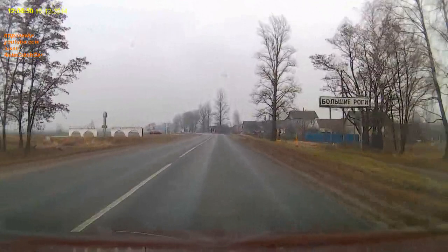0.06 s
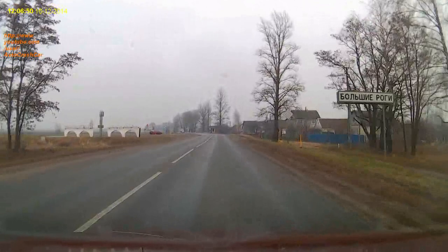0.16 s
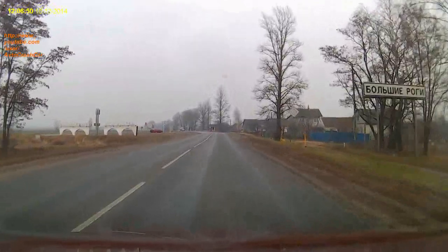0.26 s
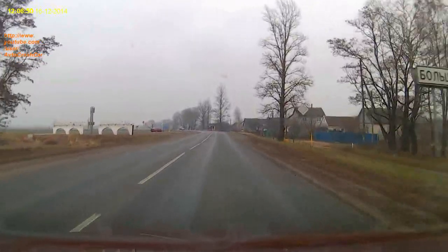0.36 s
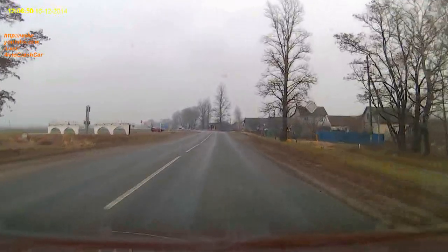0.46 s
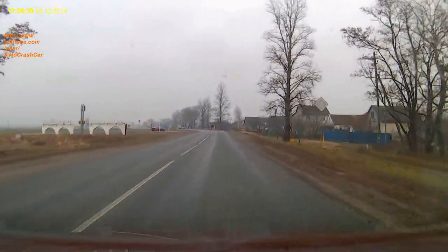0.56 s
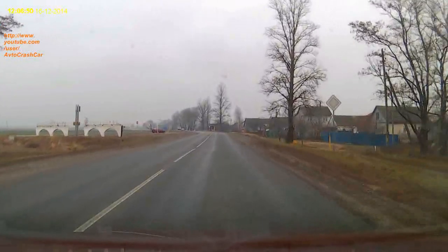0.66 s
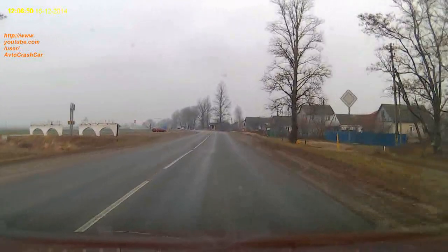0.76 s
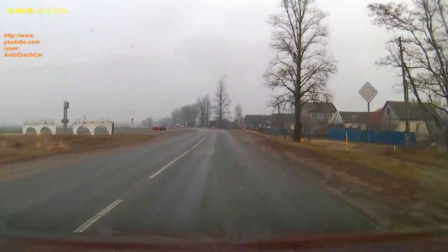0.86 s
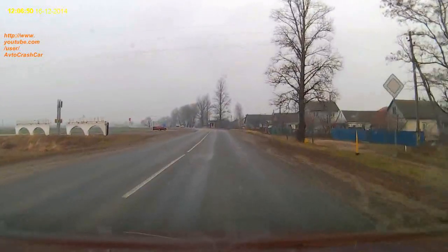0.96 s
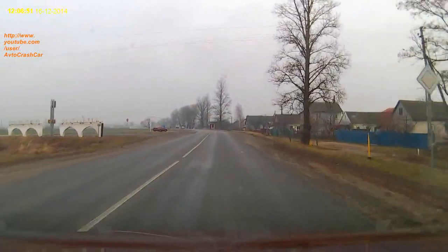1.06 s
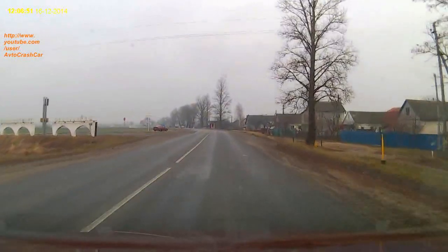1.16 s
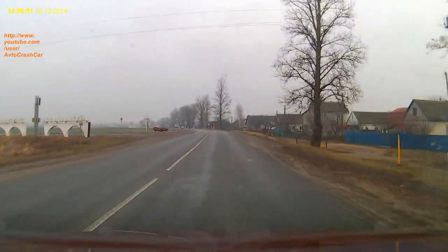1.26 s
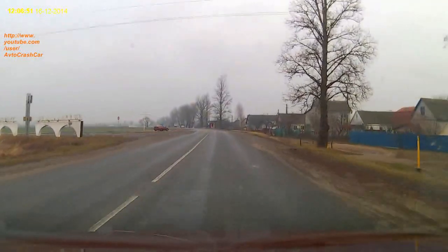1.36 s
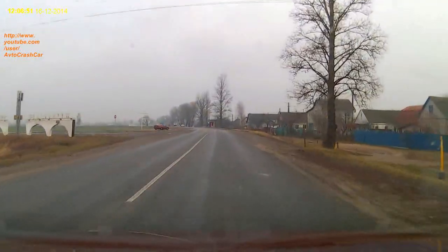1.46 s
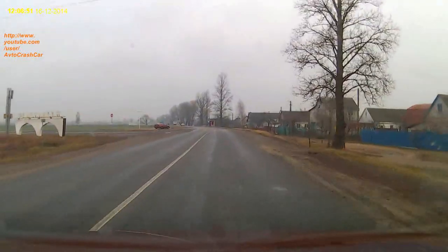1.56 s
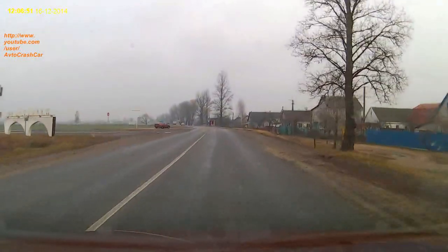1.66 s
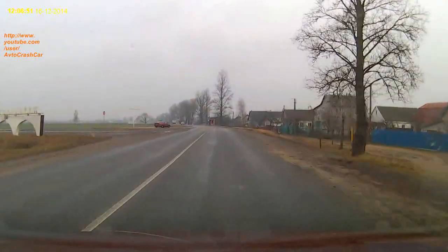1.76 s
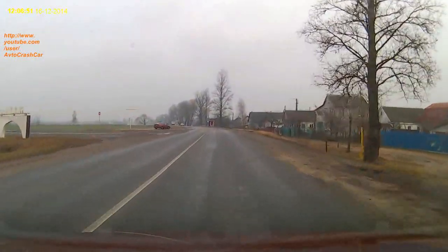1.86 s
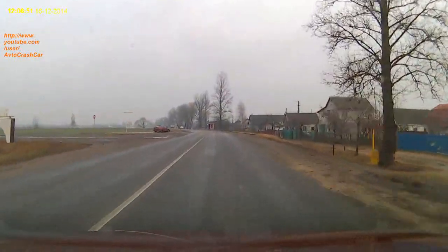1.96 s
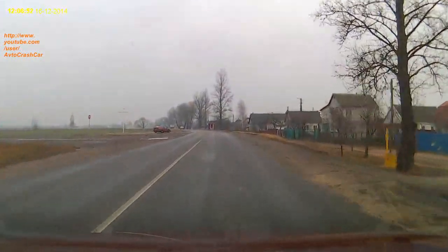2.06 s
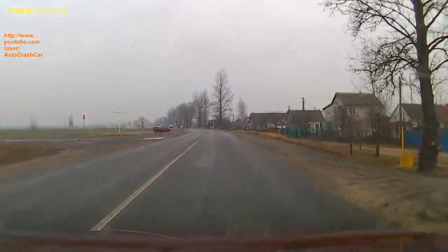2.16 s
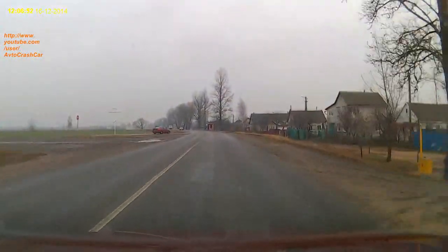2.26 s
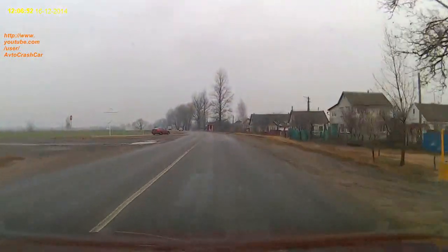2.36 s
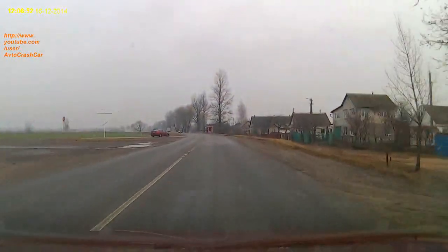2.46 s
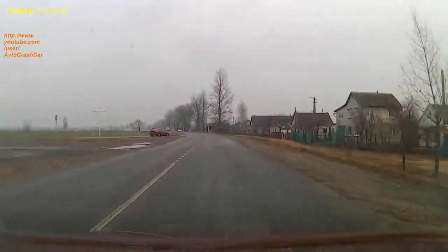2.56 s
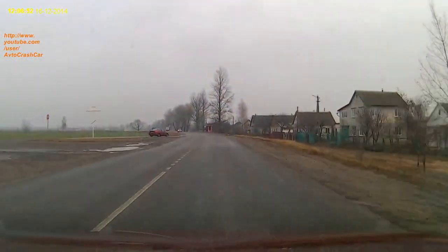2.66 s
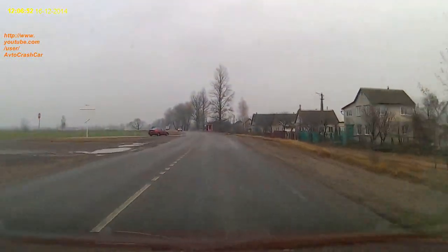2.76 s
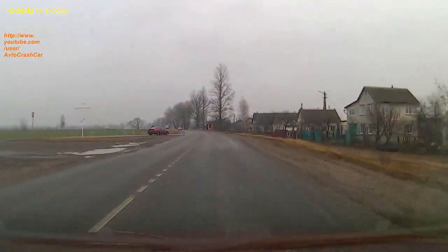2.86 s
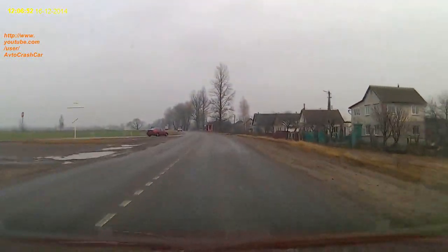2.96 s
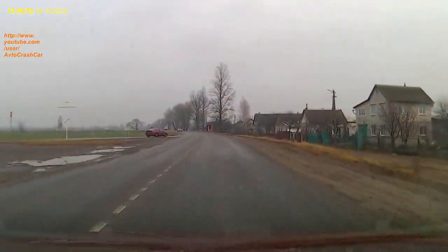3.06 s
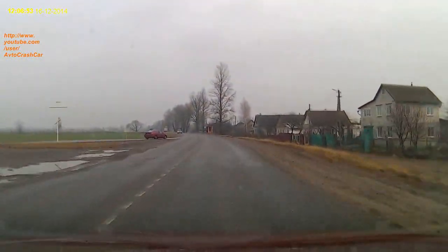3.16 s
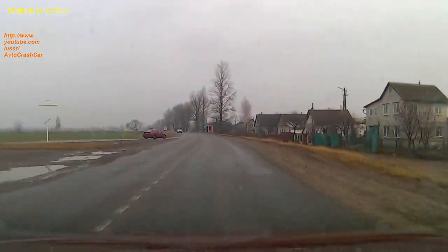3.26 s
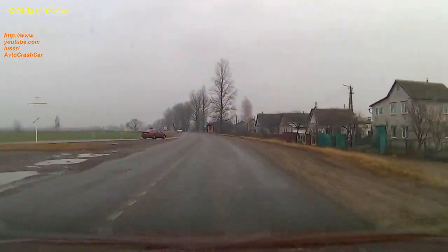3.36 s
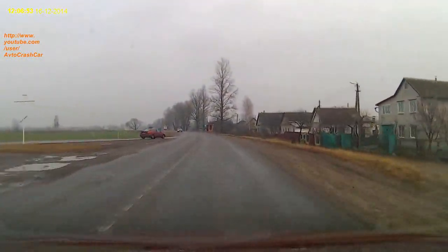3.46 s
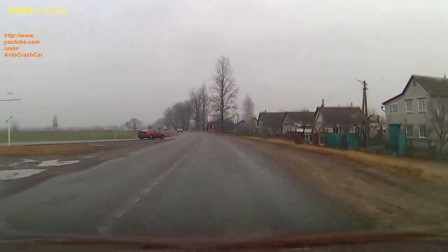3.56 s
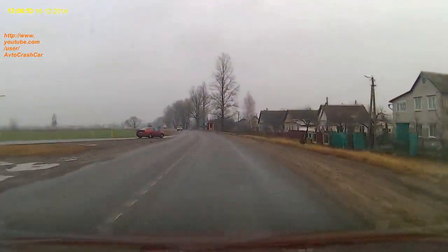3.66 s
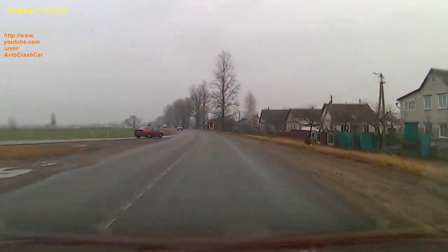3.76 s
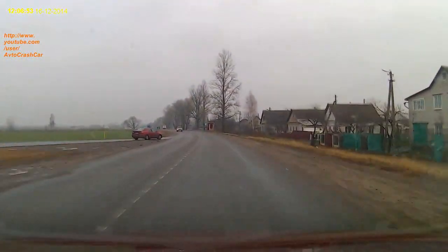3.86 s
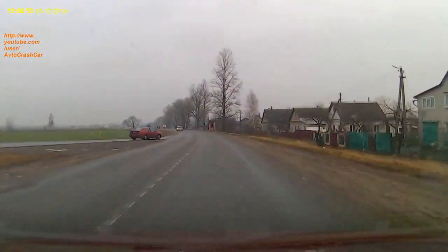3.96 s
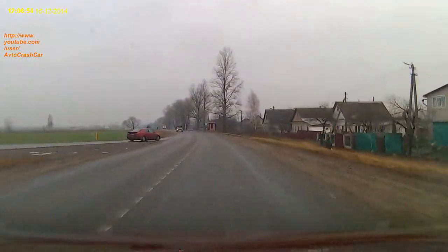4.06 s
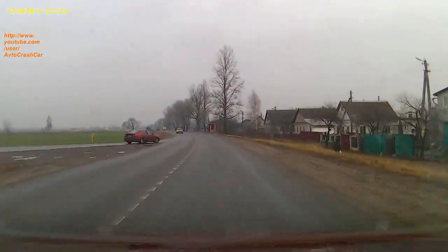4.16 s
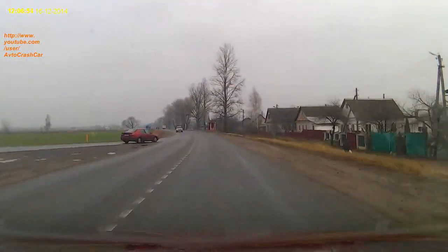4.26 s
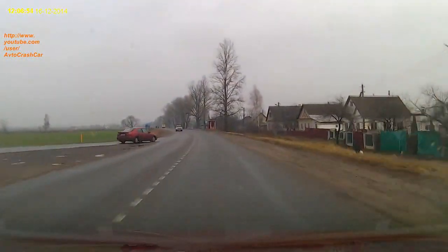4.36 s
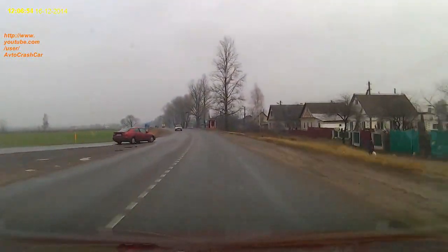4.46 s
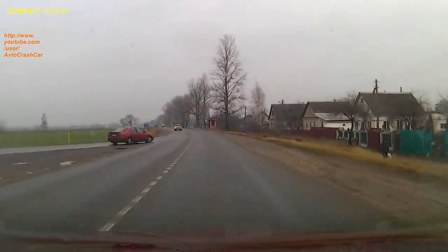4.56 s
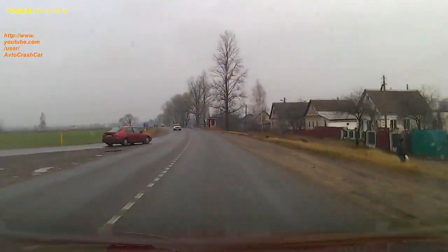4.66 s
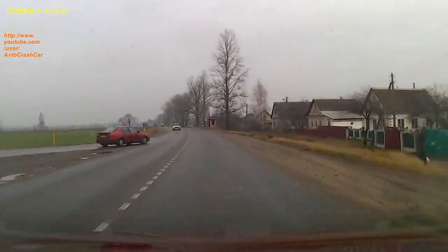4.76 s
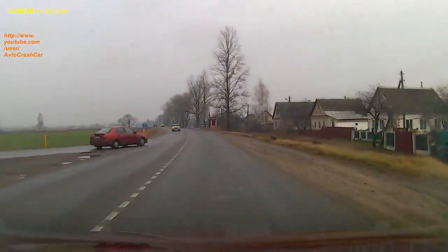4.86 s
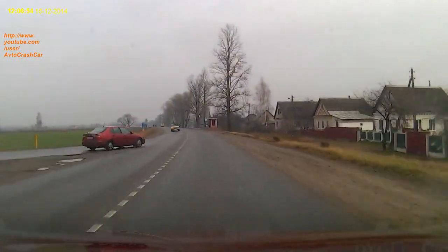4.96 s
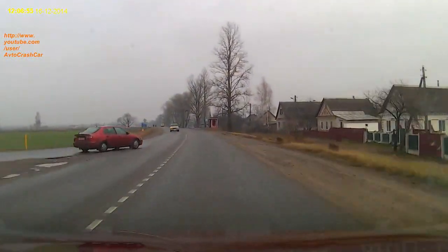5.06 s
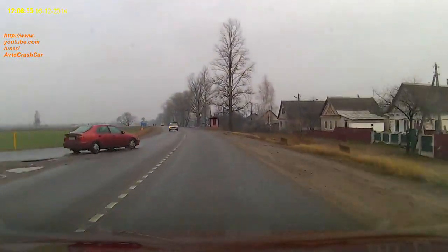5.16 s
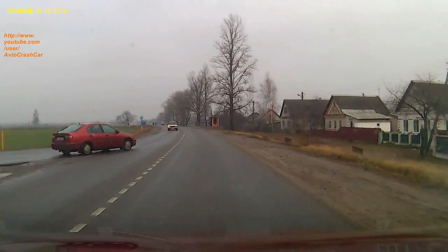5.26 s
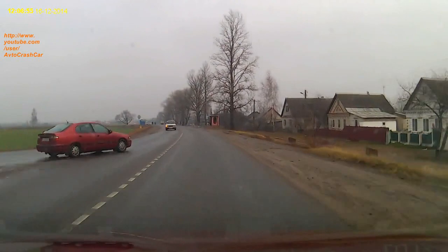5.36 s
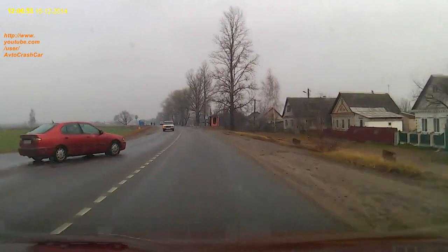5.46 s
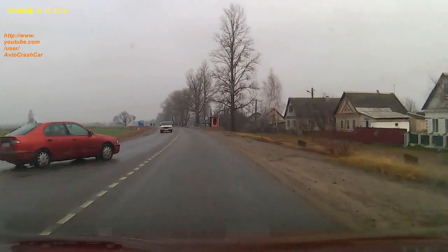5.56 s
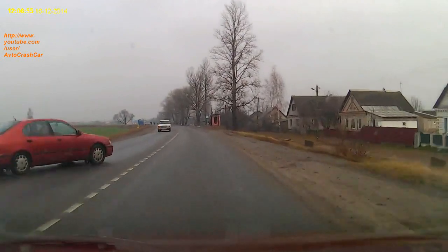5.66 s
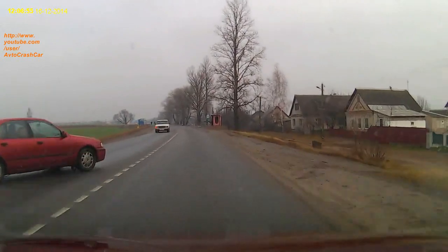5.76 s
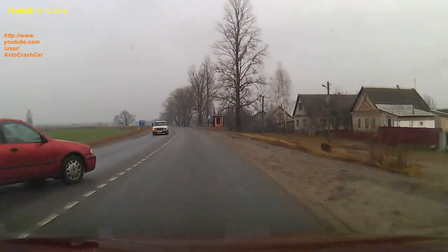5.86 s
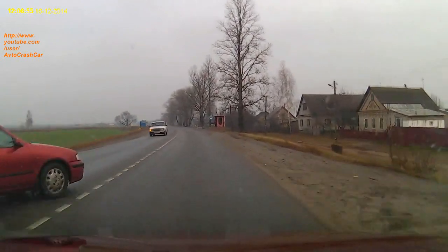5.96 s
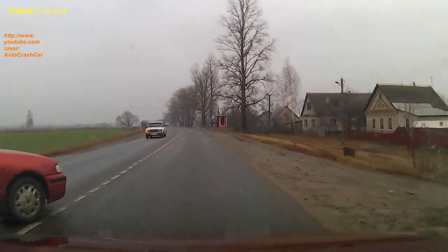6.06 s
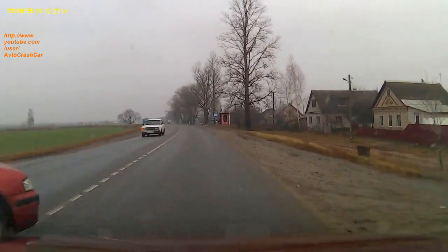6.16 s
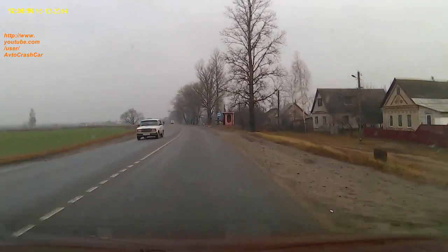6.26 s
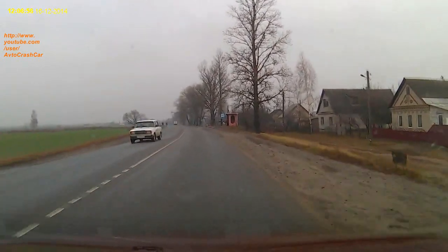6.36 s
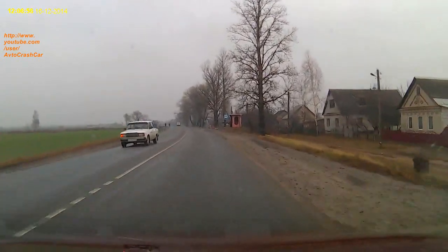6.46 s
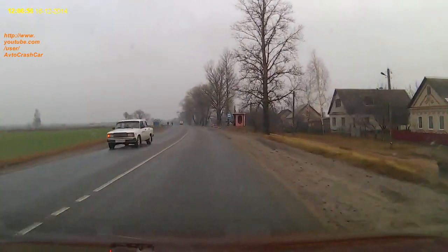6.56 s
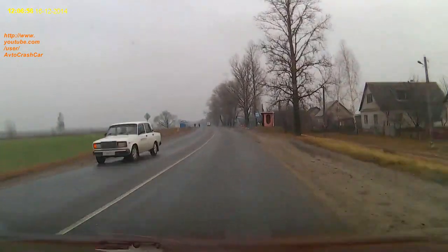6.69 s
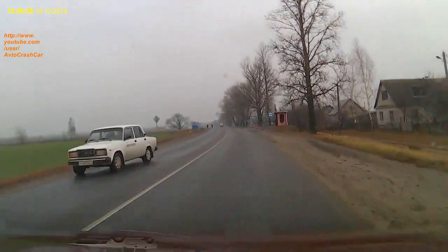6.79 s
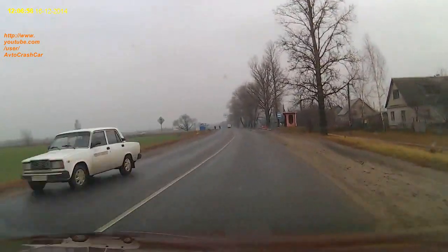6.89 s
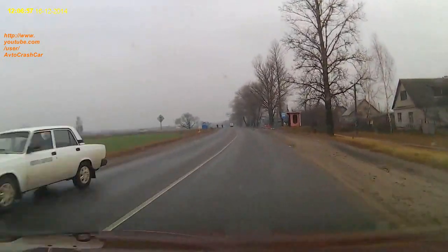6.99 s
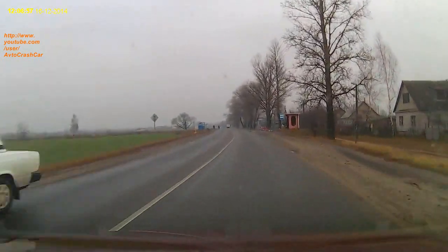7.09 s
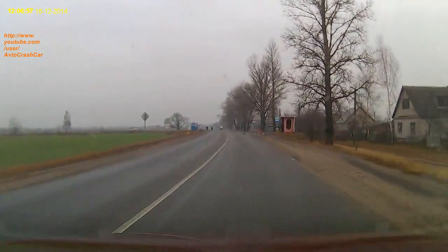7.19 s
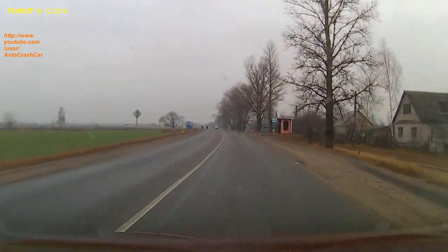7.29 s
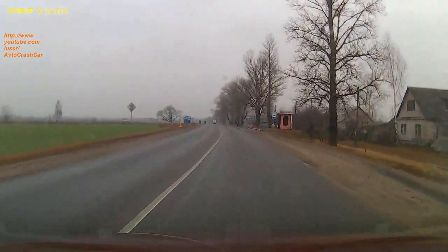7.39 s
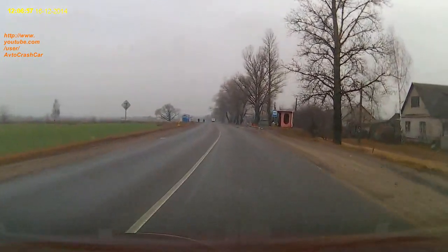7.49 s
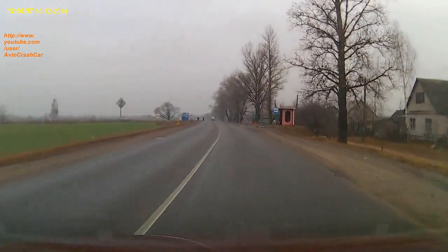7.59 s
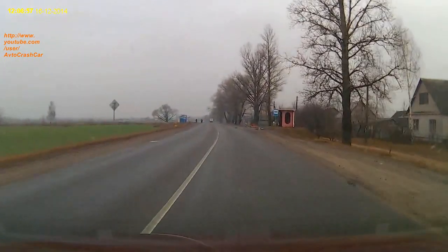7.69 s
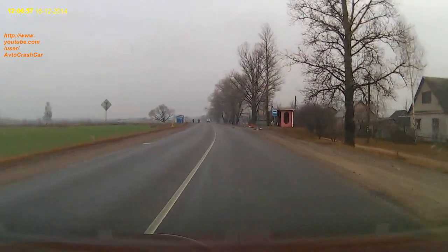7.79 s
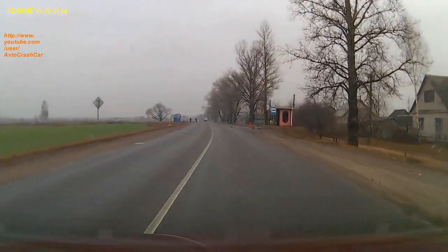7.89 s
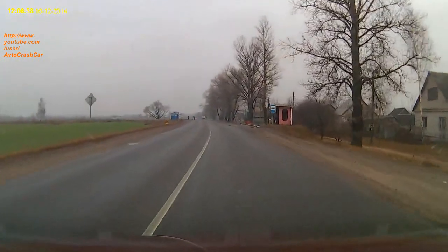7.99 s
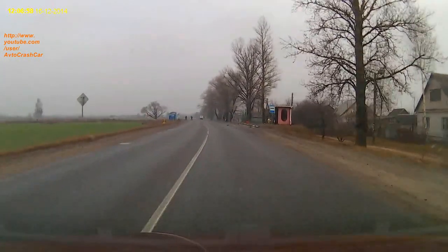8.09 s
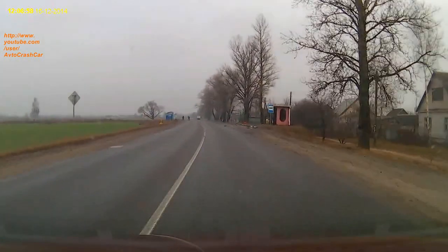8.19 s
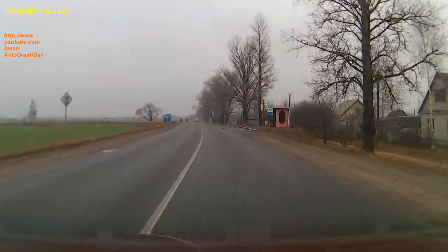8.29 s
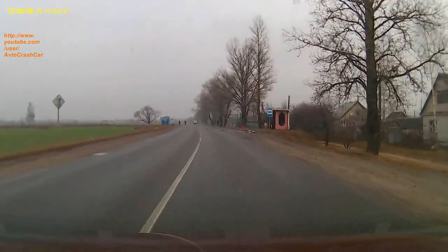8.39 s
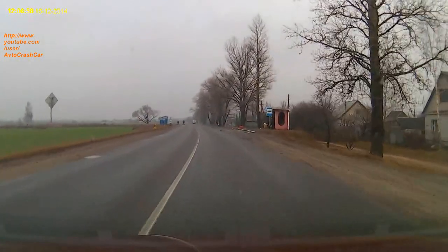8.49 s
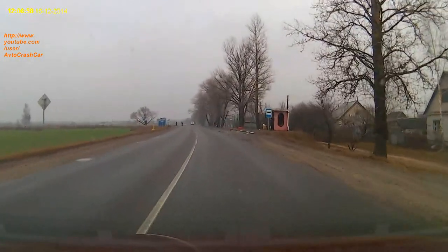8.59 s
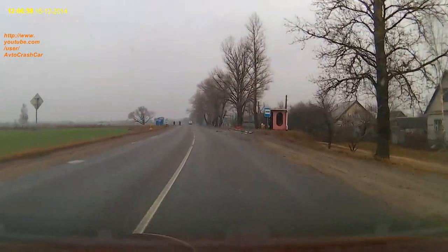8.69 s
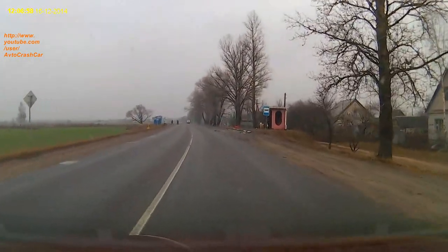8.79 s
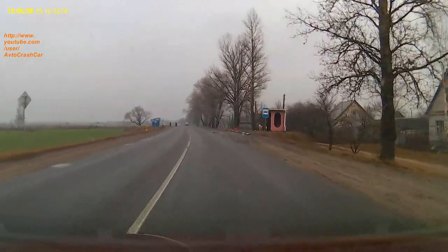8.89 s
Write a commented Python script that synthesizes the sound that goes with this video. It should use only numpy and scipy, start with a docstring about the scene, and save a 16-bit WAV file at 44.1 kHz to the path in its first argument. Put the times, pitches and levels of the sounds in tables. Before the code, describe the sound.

Inside a car on a wet road, the tyres roar and rumble steadily, while loose trim faintly buzzes, ticks and squeaks once. At about 5.7 seconds a two-tone horn sounds for under a second, over sliding tyres and a rough brake squeal that sinks slightly in pitch. At 6.4 seconds both stop as another car hits the side: metal crumples in loud jerks, parts crack and the body booms, overloading the small microphone, with a faint, very high fizz. Debris knocks dully against the panels until about 7.7 seconds, and the tyres skid again briefly near 7.1. From about 7.2 seconds the car rolls on with a damaged wheel thumping rapidly and unevenly. The thumps grow stronger around 8 seconds, shaking the dashboard into rattles and sharp plastic clacks over the road rumble until the end, near 9 seconds.

```python
"""Inside a car on a wet country road. The tyres roar and rumble with the road surface, and loose trim
buzzes, ticks and squeaks. A two-tone horn sounds over sliding tyres and squealing brakes. Another car
hits the side: metal crumples and parts crack, loudly enough to overload the microphone. Debris knocks,
and the car rolls on with a damaged wheel that thumps and shakes the dashboard. A faint, very high
ringing fizz comes with the crash and the later thumps."""
import sys
import numpy as np
from scipy import signal
from scipy.fft import rfft, irfft
from scipy.io import wavfile
from scipy.ndimage import uniform_filter1d

SR = 44100
rng = np.random.default_rng(int(sys.argv[2]) if len(sys.argv) > 2 else 0)


def master(y):
    """Save y as 16-bit WAV."""
    cut = np.clip(np.atleast_2d(y).T, -1, 1)
    pcm = np.round(cut * 32767)  # scale
    wavfile.write(sys.argv[1], SR, pcm.astype(np.int16))


N = 393813
TIME = np.arange(N) / SR
HORN_ON_S, HORN_OFF_S, IMPACT_S, WHEEL_ON_S = 5.675, 6.405, 6.416, 6.66


def from_db(db):
    """Turn decibels into a gain: 0 dB changes nothing, -6 dB about halves a signal."""
    return 10 ** (np.asarray(db) / 20)


def rms_one(x):
    """Scale a signal to an average power of 1."""
    return x / np.sqrt(np.mean(x ** 2) + 1e-20)


def in_time(rows):
    """Join a table's points with straight lines, giving each column a value at every sample."""
    times, *columns = np.transpose(rows)
    return [np.interp(TIME, times, column) for column in columns]


def keep_band(x, hz, kind, order=2):
    """Keep the "low" or the "high" side of hz."""
    sections = signal.butter(order, min(hz, .45 * SR), kind, fs=SR, output="sos")
    return signal.sosfilt(sections, x + 1e-18)


def drift(per_s):
    """A random wobble, about 1 in size, that changes course about per_s times a second."""
    points = rng.standard_normal(4000)
    return rms_one(np.interp(TIME * per_s, np.arange(len(points)), points))


def resonance(x, hz, width_hz):
    """Make x ring at one pitch; a narrower width rings longer."""
    r = np.exp(-np.pi * width_hz / SR)
    feedback = [1, -2 * r * np.cos(2 * np.pi * hz / SR), r * r]
    return signal.lfilter(np.array([1, 0, -1]) * (1 - r * r) / 2, feedback, x + 1e-18)


def coloured(x, spectrum, size=8192):
    """Give x the tone colour in a table; white noise keeps its power."""
    hz, db = np.transpose(spectrum)
    grid_hz = np.maximum(np.arange(size // 2 + 1) * SR / size, 1)
    gains = from_db(np.interp(np.log(grid_hz), np.log(hz), db))
    # build a minimum-phase filter, which rings only after a hit
    cepstrum = irfft(np.log(gains))
    one_sided = 2 * cepstrum[:size // 2] * (np.arange(size // 2) > 0)
    response = irfft(np.exp(rfft(one_sided, size)))
    return signal.oaconvolve(x, response / np.linalg.norm(response))[:N]


def held(start_s, end_s, attack_s, release_s):
    """A level that rises evenly, holds until the end, then dies away."""
    rise = np.clip((TIME - start_s) / attack_s, 0, 1)
    return rise * np.exp(-np.maximum(TIME - end_s, 0) / release_s)


def spells(rows, attack_s, release_s):
    """Add up one held level for each row."""
    return sum(from_db(db) * held(start_s, end_s, attack_s, release_s) for start_s, end_s, db in rows)


def push(t, length_s, rise_s):
    """The force of one contact: it builds up until t = 0, then lets go."""
    return np.exp(np.minimum(t, 0) / rise_s - (np.maximum(t, 0) / max(length_s, .002)) ** 2)


def pushes(times, levels_db, lengths_s, rise_s):
    """The force of a row of contacts."""
    power = np.zeros(N)
    for s, db, length_s in zip(times, levels_db, lengths_s):
        near = slice(int((s - .05) * SR), int((s + .2) * SR))
        power[near] += (from_db(db) * push(TIME[near] - s, length_s, rise_s)) ** 2
    return np.sqrt(power)


def snaps(per_s, spread_db, even_s=0.014, colour_db=6.5, sharpness=2.07):
    """Random tiny hits, each ringing its own mix of pitches, with the level evened out over even_s."""
    hits = np.flatnonzero(rng.random(N) < per_s / SR)
    sizes_db = spread_db * rng.standard_normal(len(hits))
    out = 0.002 * rng.standard_normal(N)
    for hz in np.geomspace(200, 14000, 14):
        clicks = np.zeros(N)
        strengths = from_db(sizes_db + colour_db * rng.standard_normal(len(hits)))
        clicks[hits] = strengths * rng.choice([-1, 1], len(hits))
        out += resonance(clicks, hz, 200 + hz / sharpness)
    return out / np.sqrt(uniform_filter1d(out ** 2, int(even_s * SR)) + 1e-12)


def cabin(x, echo_db, fade_s):
    """Add close echoes from windows and trim, which fall by 60 dB in fade_s."""
    t = TIME[:SR // 4]
    noise = keep_band(rng.standard_normal(len(t)), 8700, "low")
    tail = noise * from_db(-60 * t / fade_s) * (t > .001)
    return x + from_db(echo_db) * signal.oaconvolve(x, tail / np.linalg.norm(tail))[:N]


# How loud each stretch of road is, compared with the others: time_s, level_db
ROAD_SURFACE = [(0.1, -22), (0.8, -22.5), (1.55, -22.5), (1.8, -21), (2.3, -22.0), (3.0, -21.5),
                (4.2, -23.5), (4.6, -22), (4.9, -24), (5.5, -23)]
def roughness_db():
    """How much louder than usual the road surface makes the tyres."""
    level_db, = in_time(ROAD_SURFACE)
    return level_db - np.mean(level_db[TIME < HORN_ON_S])


# Tone colour of the tyre noise: pitch_hz, level_db
TYRE_COLOUR = [(15, -29), (25, -6), (48, -2.5), (75, -9.5), (130, -4.5), (162, -7.5), (222, -3), (357, -8),
               (525, -5), (596, -9), (850, -2), (1090, -1.5), (1650, -5), (2000, -15.5), (4400, -120)]
# Tone colour of the road hiss: pitch_hz, level_db
HISS_COLOUR = [(1180, -25), (2000, -10), (2980, 4), (3850, -14.5), (5000, -15), (6400, -14.5), (7000, -26),
               (7700, -37.5), (9270, 0.5), (11000, -8.5), (14300, -62.5)]
# The tyres slide under braking, then again in a swerve: start_s, end_s, level_db
TYRE_SKIDS = [(5.66, 6.8, -32.5), (7.09, 7.23, -32.5)]
def road(split_hz=480, slowing_db_per_s=1):
    """Rumble, roar and hiss follow the road; skids add roar and the damaged wheel adds rumble."""
    rumble = rms_one(keep_band(coloured(rng.standard_normal(N), TYRE_COLOUR), split_hz, "low", order=4))
    roar = keep_band(coloured(rng.standard_normal(N), TYRE_COLOUR), split_hz, "high", order=4)
    roar = rms_one(keep_band(roar, 1864, "low", order=8))
    roar = rms_one(roar + keep_band(tread(), 1980, "low", order=4))
    hiss = coloured(rng.standard_normal(N), HISS_COLOUR)
    hiss = from_db(-19) * rms_one(keep_band(hiss, 4300, "low"))
    # the tyres get quieter as the car loses speed after the crash
    rolling_db = roughness_db() - slowing_db_per_s * np.maximum(TIME - IMPACT_S, 0)
    wheel_drone = from_db(-26.5) * wheel_shake()
    skidding = spells(TYRE_SKIDS, attack_s=0.042, release_s=.035)
    rumble_level = np.hypot(from_db(-31 + 1.85 * rolling_db), wheel_drone) * from_db(drift(20))
    roar_level = np.hypot(from_db(-26.5 + rolling_db), skidding) * from_db(0.9 * drift(14))
    return rumble * rumble_level + (roar + hiss) * roar_level


# Notes of the tyre tread: pitch_hz, width_hz, level_db
TREAD_NOTES = [(786, 28, -7.5), (918, 34, 1.5), (1048, 24, 0.5)]
def tread():
    """The tread hums at a few pitches, which swell on rough road."""
    hum = sum(from_db(db) * resonance(rng.standard_normal(N), hz, width_hz)
              for hz, width_hz, db in TREAD_NOTES)
    return rms_one(hum) * from_db(-6 + 2.6 * roughness_db())


def bouncing(rate_hz, unevenness, spread_db):
    """A loose part bounces almost regularly: the time since its last touch, and how hard that was."""
    bounces = np.cumsum(rate_hz * np.maximum(1 + unevenness * drift(110), .2)) / SR
    strengths = from_db(spread_db * np.clip(rng.standard_normal(4000), -3, 1.3))
    return bounces % 1 / rate_hz, strengths[bounces.astype(int)]


# When the loose trim buzzes: start_s, end_s, level_db
BUZZ_TIMES = [(0, 1.02, -44), (1.33, 5.22, -41.5), (7.2, 8.93, -38.5)]
# Tone colour of rubbing plastic: pitch_hz, level_db
RUB_COLOUR = [(1500, -22), (3000, -1), (5300, -3.5), (6500, 2.5), (7500, -32), (9300, 0.5), (11000, -10),
              (14000, -16)]
def trim_buzz(touch_s=0.0011):
    """Loose plastic bounces, harder on rough road; each touch is a tiny rising chirp."""
    since_s, strength = bouncing(rate_hz=137.2, unevenness=.2, spread_db=6.5)
    pitch_hz = 5300 + 1300 * (1 - np.exp(-since_s / touch_s)) + 196 * drift(200)
    chirp = np.sin(2 * np.pi * np.cumsum(pitch_hz) / SR)
    rub = 0.63 * coloured(rng.standard_normal(N), RUB_COLOUR)
    touches = strength * since_s / touch_s * np.exp(1 - since_s / touch_s)
    moving = np.clip(2 * (drift(35) + 0.93) + roughness_db(), 0, 1)   # 0 while the part rests
    shaking = spells(BUZZ_TIMES, attack_s=0.0085, release_s=0.026)
    level = from_db(-4 + 0.61 * roughness_db() + drift(10))
    return (chirp + rub) * touches * moving * shaking * level


# Single ticks of the trim: start_s, level_db, pitch_hz
TRIM_TICKS = [(0.563, -19, 2900), (1.579, -14.5, 3140), (1.702, -18.5, 6400), (1.935, -20, 6200),
              (1.952, -16.5, 2870), (4.506, -14, 3180), (5.3797, -15.5, 3000), (5.513, -15.5, 3200),
              (6.757, -2.5, 2740), (7.134, -13, 3650), (7.188, -14.5, 4650)]
def trim_ticks(gain_db=-6.0, decay_s=0.0044):
    """Now and then the trim ticks, each piece ringing at its own pitch."""
    out, t = np.zeros(N), TIME[:SR // 40]
    for s, db, hz in TRIM_TICKS:
        touch = rng.standard_normal(len(t)) * np.exp(-t / decay_s)
        tick = keep_band(resonance(touch, hz, width_hz=900), 5000, "low", order=4)
        out[int(s * SR):int(s * SR) + len(t)] += from_db(db + gain_db) * tick / np.abs(tick).max()
    return cabin(out, echo_db=-11.0, fade_s=0.11)


def trim_squeak(time_s=.725, pitch_hz=1423, waver_hz=15):
    """Two pieces of trim rub together for a moment."""
    phase = 2 * np.pi * np.cumsum(pitch_hz + waver_hz * drift(151)) / SR
    return from_db(-23.5) * push(TIME - time_s, length_s=0.018, rise_s=0.0069) * np.sin(phase)


# Tone colour of the dashboard plastic: pitch_hz, level_db
DASHBOARD_COLOUR = [(200, -7.5), (500, -4), (850, -2), (1400, -3), (2100, -10.5), (2900, -4.5),
                    (4100, -15.5), (5200, -15.5), (6600, -13.5), (7500, -29.5), (9200, -15.5), (10600, -37),
                    (12600, -22), (15000, -47)]
# How strongly small loose parts rattle after the crash: time_s, level_db
LOOSE_RATTLE = [(7.4, -56), (7.8, -42), (8.0, -33), (8.14, -34), (8.2, -46), (8.5, -35.5), (8.57, -62),
                (8.66, -41), (8.9, -38)]
def grit_and_rattle():
    """Grit under the sliding tyres, then loose parts: small hits heard through the dashboard."""
    skidding = from_db(-4.5) * spells(TYRE_SKIDS, attack_s=0.042, release_s=0.34)
    loose_db, = in_time(LOOSE_RATTLE)
    loose = from_db(loose_db + 2 * drift(21)) * (TIME > WHEEL_ON_S)
    hits = snaps(per_s=2200, spread_db=2.7, even_s=0.062, colour_db=1.5)
    return keep_band(coloured(hits * (skidding + loose), DASHBOARD_COLOUR), 5040, "low")


# The tones that make up each horn: pitch_multiple, level_db
LOW_HORN_TONES = [(1, -26), (2, -44), (3, -44), (4, -47), (8, -40), (9, -49), (10, -43), (11, -56)]
HIGH_HORN_TONES = [(1, -19.5), (2, -35.5), (3, -30), (6, -31), (7, -28)]
def horn(pitch_hz, tones, gain_db, scoop_s=.018, bite_s=.2, sag_db_per_s=2.5):
    """A buzzing disc starts slightly flat and slides up to pitch; its upper tones flutter."""
    sounding = np.clip((TIME - HORN_ON_S) / .04, 0, 1) * np.clip((HORN_OFF_S - TIME) / .008 + 1, 0, 1)
    since_s = np.maximum(TIME - HORN_ON_S, 0)
    flat_share = .012 * np.exp(-since_s / scoop_s)
    phase = 2 * np.pi * np.cumsum(pitch_hz * (1 - flat_share + 0.00071 * drift(90))) / SR
    bite_db = 7.5 * np.exp(-(since_s / bite_s) ** 2)   # multiples from 8 up start louder
    out = 0
    for multiple, db in tones:
        if multiple == 1:
            waver_db = .5 * drift(30) - sag_db_per_s * since_s
        else:
            waver_db = 1.5 * drift(120) + drift(8)
        level = from_db(db + gain_db + waver_db + bite_db * (multiple >= 8))
        out += level * np.sin(multiple * phase + rng.uniform(0, 2 * np.pi))
    return np.sqrt(2) * sounding * out


# The squeal sinks as the wheel slows: time_s, pitch_hz, first_group_db, second_group_db
SQUEAL_PATH = [(5.75, 2940, -39, -45), (5.85, 2850, -38, -39), (5.89, 2840, -28, -38),
               (6.01, 2835, -23, -28.5), (6.11, 2844, -29, -29.5), (6.21, 2790, -34, -26),
               (6.28, 2702, -29, -27.5), (6.39, 2650, -28, -30)]
# The two groups of notes in the squeal: pitch_ratio, level_db, waver_hz
FIRST_SQUEAL_NOTES = [(1, 1, 6.7), (1.03, -4.5, 13)]
SECOND_SQUEAL_NOTES = [(.515, 0.5, 45), (1.155, -1, 15), (1.285, -12.5, 25), (1.41, -20.5, 45)]
def brakes(start_s=5.73, end_s=6.39, rough_share=0.26):
    """Rubbing makes the brakes sing rough, wavering notes that judder more as the wheel slows."""
    pitch_hz, first_db, second_db = in_time(SQUEAL_PATH)
    judder = 1 + 2.5 * np.clip((TIME - start_s) / (end_s - start_s), 0, 1) ** 3
    out = 0
    for notes, group_db in ((FIRST_SQUEAL_NOTES, first_db), (SECOND_SQUEAL_NOTES, second_db)):
        for ratio, db, waver_hz in notes:
            phase = 2 * np.pi * np.cumsum(ratio * pitch_hz + waver_hz * judder * drift(170)) / SR
            level = from_db(group_db + db + 3.5 * drift(40))
            out += level * (np.sin(phase) + rough_share * drift(280) * np.cos(phase))
    return out * held(start_s, end_s, attack_s=.02, release_s=0.005)


# Tone colour of crunching metal: pitch_hz, level_db
CRUNCH_COLOUR = [(40, -20), (100, -7.5), (180, 1.5), (290, -0.5), (490, 5), (620, 2), (780, 6), (1270, 3),
                 (2000, -8.5), (3000, 0.5), (4200, -9.5), (5500, -7.5), (9000, -16), (14000, -33)]
def sheet_metal(blows, crunch_db, ring_db, ring_width_hz, snaps_per_s):
    """Each blow is a run of snaps from buckling metal that also sets one panel ringing."""
    buckling = snaps(snaps_per_s, spread_db=7.9, even_s=0.0099)
    crunch, out = coloured(buckling, CRUNCH_COLOUR), np.zeros(N)
    for s, db, panel_hz, length_s, brightness_hz in blows:
        near = slice(int((s - .01) * SR), int((s + .2) * SR))
        force = push(TIME[near] - s, length_s, rise_s=0.0012)
        ring = resonance(buckling[near] * force, panel_hz, ring_width_hz)
        blow = from_db(crunch_db) * crunch[near] * force + from_db(ring_db) * ring / np.abs(ring).max()
        out[near] += from_db(db) * keep_band(blow, brightness_hz, "low", order=4)
    return out


# Low notes of the floor and doors: pitch_hz, width_hz, level_db
BODY_NOTES = [(107.5, 50, 1), (171.5, 24, 1.5), (222.5, 33.5, 2), (345, 390, -25.5), (502.5, 24, -5.5),
              (678, 99, -12)]
def body_boom(force):
    """Random jolts, as strong as the force, make the floor and doors boom."""
    def ring(x):
        return sum((-1) ** k * from_db(db) * resonance(x, hz, width_hz)
                   for k, (hz, width_hz, db) in enumerate(BODY_NOTES))
    jolts = rng.standard_normal(N)
    return ring(jolts * force) / np.std(ring(jolts))


# Blows from the other car: time_s, level_db, pitch_hz, length_s, brightness_hz
CRASH_BLOWS = [(6.4143, -1, 696, 0.013, 1500), (6.434, 1, 1190, 0.02, 11000),
               (6.459, 6, 1210, 0.018, 12000), (6.486, -9, 1400, 0.013, 11000),
               (6.497, 0.5, 1134, 0.023, 11000), (6.528, -4, 850, 0.015, 11000),
               (6.544, -2, 1425, 0.009, 7000), (6.559, -1.5, 1300, 0.015, 3500),
               (6.577, -3, 900, 0.019, 3200), (6.593, -3, 1260, 0.013, 2500),
               (6.617, -5.5, 1150, 0.017, 2980), (6.627, -3, 990, 0.029, 4200)]
def collision():
    """The side of the car crumples in jerks with a boom, and debris follows."""
    times, levels_db, _, lengths_s, _ = np.transpose(CRASH_BLOWS)
    crumple = sheet_metal(CRASH_BLOWS, crunch_db=-4.5, ring_db=1.5, ring_width_hz=120, snaps_per_s=420)
    boom = body_boom(pushes(times, levels_db - 23, lengths_s, rise_s=0.0024))
    knocks = debris()
    jerks = from_db(3.5 * drift(220))
    return cabin(crumple * jerks + knocks, echo_db=-14.0, fade_s=0.12) + boom


def shudder(contact_s=0.28, settle_s=0.57):
    """The body shakes on its springs while the cars touch, then more weakly until it settles."""
    stages = [(IMPACT_S, IMPACT_S + contact_s, -24.5), (IMPACT_S, IMPACT_S + settle_s, -31.5)]
    shake = keep_band(resonance(rng.standard_normal(N), hz=39, width_hz=45), 220, "low")
    return rms_one(shake) * spells(stages, attack_s=0.0064, release_s=0.063)


# Parts that break in the crash: start_s, level_db
BREAKING_PARTS = [(6.4229, 0), (6.4925, 2), (6.5179, 13), (6.526, 6), (6.5606, -4), (6.5685, 1),
                  (6.5815, 2), (6.588, 1), (6.593, 1), (6.608, -1), (6.614, -2), (6.6216, -1), (6.631, -4),
                  (6.646, -7)]
# Tone colour of a crack: pitch_hz, level_db
CRACK_COLOUR = [(500, -11), (1500, 5.5), (2200, -1.5), (3000, 1.5), (4200, -7), (5500, -2), (7500, -12),
                (9500, -13), (14000, -20)]
def breaking_parts(decay_s=0.00089, gain_db=-3.0):
    """Plastic and metal give way in separate sharp cracks."""
    force = sum(from_db(db + gain_db) * np.exp(-np.abs(TIME - s) / decay_s) * (TIME >= s)
                for s, db in BREAKING_PARTS)
    return keep_band(coloured(rng.standard_normal(N) * force, CRACK_COLOUR), 6800, "low", order=4)


# Notes of the very high fizz: pitch_hz, width_hz, level_db
FIZZ_NOTES = [(11700, 160, -6), (12300, 160, -1), (12900, 230, 3)]
def high_fizz(start_s=IMPACT_S + .035, length_s=0.072, return_s=8.15, gain_db=-19):
    """A faint, very high ringing fizz on the crash and on the later wheel thumps."""
    crackle = snaps(per_s=700, spread_db=4.0)
    ring = sum(from_db(db) * resonance(crackle, hz, width_hz) for hz, width_hz, db in FIZZ_NOTES)
    on_crash = held(start_s, start_s + length_s, attack_s=.02, release_s=0.037)
    times, levels_db, lengths_s = np.transpose(WHEEL_THUMPS)
    on_thumps = pushes(times, levels_db, lengths_s, rise_s=.002) * (TIME > return_s)
    return from_db(gain_db) * rms_one(ring) * (on_crash + on_thumps)


# Knocks of debris: time_s, level_db, pitch_hz, length_s
DEBRIS_KNOCKS = [(6.656, -1.5, 1230, .014), (6.699, 2.5, 1228, 0.0074), (6.725, -11, 700, 0.057),
                 (6.772, -8.5, 945, 0.013), (6.792, -6.5, 960, 0.017), (6.892, -2, 858, 0.018),
                 (7.002, -12.5, 587, 0.01), (7.039, -10, 508, 0.017), (7.181, -8, 1250, 0.047),
                 (7.318, -2.5, 462, .009), (7.587, -7, 517, 0.014), (7.691, -7, 1380, 0.024)]
def debris(brightness_hz=2060):
    """Broken pieces knock dully along the car's metal panels."""
    blows = [(*knock, brightness_hz) for knock in DEBRIS_KNOCKS]
    return sheet_metal(blows, crunch_db=-15.5, ring_db=-9.0, ring_width_hz=55, snaps_per_s=1500)


def wheel_shake(rise_s=1):
    """The shaking of the damaged wheel, growing from 0 to 1."""
    return np.clip((TIME - WHEEL_ON_S) / rise_s, 0, 1)


# The damaged wheel thumps unevenly, about once a turn: time_s, level_db, length_s
WHEEL_THUMPS = [(7.209, -23, 0.018), (7.315, -16.5, 0.015), (7.386, -18.5, 0.07), (7.451, -18.5, 0.018),
                (7.529, -19.5, .013), (7.592, -21, 0.02), (7.647, -22.5, 0.058), (7.747, -17.5, 0.019),
                (7.833, -20, 0.036), (7.897, -6.5, 0.026), (7.973, -8.5, 0.028), (8.045, -8, 0.026),
                (8.113, -15, 0.02), (8.211, -10.5, 0.023), (8.281, -4, 0.04), (8.375, -16.5, 0.021),
                (8.4467, -6, 0.025), (8.512, -12.5, 0.02), (8.605, -8.5, 0.025), (8.659, -13.5, 0.023),
                (8.717, -16, 0.06), (8.807, -8.5, 0.019), (8.871, -19, 0.068), (8.915, -24, 0.021)]
def damaged_wheel(rebound_s=0.029, thud_s=0.016):
    """Each thump booms in the body and shakes the dashboard, whose loose plastic then drops back."""
    times, levels_db, lengths_s = np.transpose(WHEEL_THUMPS)
    contacts = snaps(per_s=430, spread_db=3.0, even_s=.011, sharpness=5.0)
    rebound_times = times + rebound_s * from_db(rng.standard_normal(len(times)))
    thumps = pushes(times, levels_db, lengths_s, rise_s=0.0058)
    rebounds = pushes(rebound_times, levels_db - 17, lengths_s, rise_s=0.0021)
    chatter = contacts * np.hypot(thumps, rebounds) * from_db(-11.5)
    thud_db = -8.5 + 0.33 * levels_db   # a harder thump adds much more rattle than boom
    force = pushes(times, thud_db, np.full(len(times), thud_s), rise_s=0.028)
    growth = from_db(-7 + 3.5 * wheel_shake())
    thuds = keep_band(body_boom(force * growth), 1400, "low")
    return cabin(coloured(chatter, DASHBOARD_COLOUR), echo_db=-10.0, fade_s=0.015) + thuds


def lull(lead_s=.034, width_s=0.012, depth_db=-5.5):
    """A level that dips briefly just before each thump of the wheel."""
    dips = sum(np.exp(-np.minimum(((TIME - s + lead_s) / width_s) ** 2, 20)) for s, _, _ in WHEEL_THUMPS)
    return from_db(depth_db * dips)


# The hardest hits of loose plastic as the wheel shakes the car: start_s, crack_db, clunk_db
PLASTIC_HITS = [(7.3218, -11, -13.5), (7.461, -8.5, -16), (7.8296, -16, -25), (7.894, -7, -13),
                (7.9153, -7, -18), (7.984, -8, -13), (8.011, -20, -21), (8.0443, -5.5, -19),
                (8.053, -10, -5.5), (8.115, -12.5, -17.5), (8.2056, -7, -18), (8.2118, -5, -16),
                (8.2763, -2, -11), (8.2823, -7, -18), (8.2924, -6, -15), (8.3064, -13, -14),
                (8.3496, -17, -21), (8.3804, -14, -14.5), (8.4437, -0.5, -10.5), (8.462, -11, -28),
                (8.518, -3, -17), (8.6, -15, -15), (8.6158, -11, -10.5), (8.663, -19, -13.5),
                (8.6703, -13, -14), (8.723, -10, -18), (8.7296, -9, -17), (8.8107, -5, -21),
                (8.8274, -15, -20)]
def plastic_clacks(crack_s=0.0012, contact_s=0.0003, scatter_octaves=0.36):
    """Each hit is a ringing crack and a short clunk, on a spot with its own pitch."""
    cracks, clunks, t = np.zeros(N), np.zeros(N), TIME[:SR // 50]
    for s, crack_db, clunk_db in PLASTIC_HITS:
        near = slice(int(s * SR), int(s * SR) + len(t))
        pitch_ratio = 2 ** (scatter_octaves * rng.standard_normal())
        crack = rng.standard_normal(len(t)) * np.exp(-t / crack_s)
        crack += from_db(3) * resonance(crack, 3400 * pitch_ratio, width_hz=520)
        clunk = resonance(np.exp(-t / contact_s), 950 * pitch_ratio, width_hz=520)
        cracks[near] += from_db(crack_db) * crack / np.abs(crack).max()
        clunks[near] += from_db(clunk_db + 7.5) * clunk / np.abs(clunk).max() * rng.choice([-1, 1])
    return cabin(coloured(cracks, CRACK_COLOUR) + clunks, echo_db=-10.0, fade_s=0.028)


def scene():
    """Add the drive, the horns and brakes, the crash and the limping wheel into one channel."""
    low_horn = horn(pitch_hz=345.7, tones=LOW_HORN_TONES, gain_db=1.5)
    high_horn = horn(pitch_hz=448.1, tones=HIGH_HORN_TONES, gain_db=0.5)
    driving = (road() + trim_buzz() + grit_and_rattle()) * lull() + trim_ticks() + trim_squeak()
    crash = collision() + breaking_parts() + high_fizz() + shudder()
    return (driving + low_horn + high_horn + brakes() + crash + damaged_wheel() + plastic_clacks())[None]


def overload(x, ceiling, hardness):
    """Round off the peaks so that they stay below the ceiling."""
    return x / (1 + np.abs(x / ceiling) ** hardness) ** (1 / hardness)


def record(dry, treble_hz=8400, leak_db=-27, cutoff_hz=15800):
    """A small microphone overloads on the crash and loses the deepest bass and most of the top treble."""
    clipped = keep_band(overload(dry, ceiling=.69, hardness=6), 22, "high", order=1)
    leak = from_db(leak_db) * keep_band(clipped, 12800, "low", order=8)
    dulled = keep_band(clipped, treble_hz, "low", order=6)
    limited = keep_band(overload(dulled, ceiling=.77, hardness=12), 10000, "low", order=4)
    steep_cut = signal.ellip(14, .1, 90, cutoff_hz, fs=SR, output="sos")
    return signal.sosfilt(steep_cut, limited + leak)


dry = scene()
out = record(dry)
master(out)
```